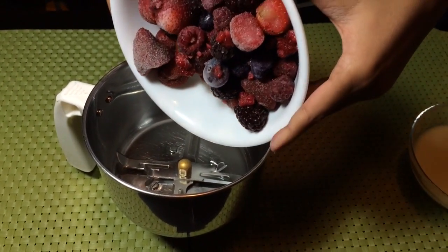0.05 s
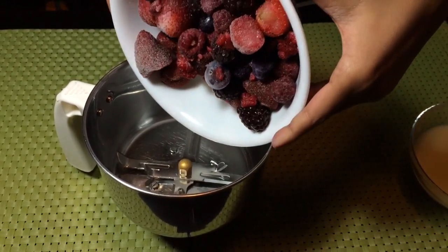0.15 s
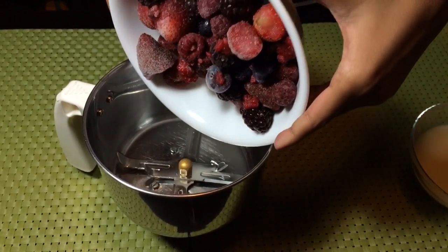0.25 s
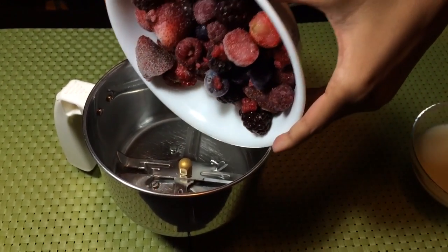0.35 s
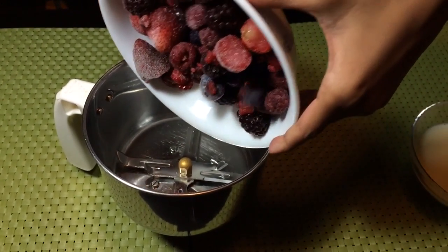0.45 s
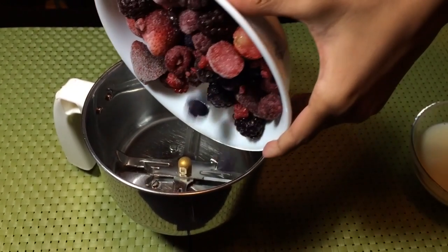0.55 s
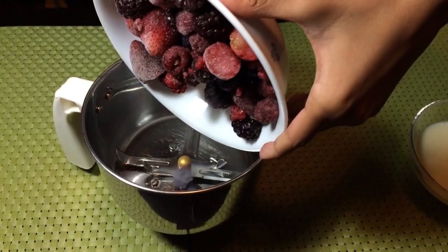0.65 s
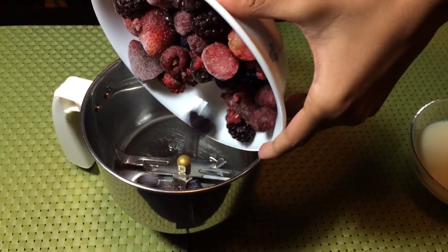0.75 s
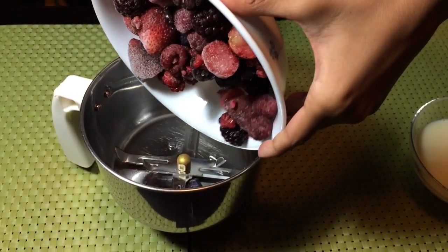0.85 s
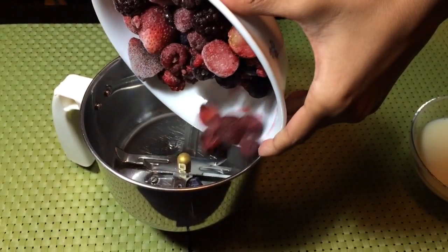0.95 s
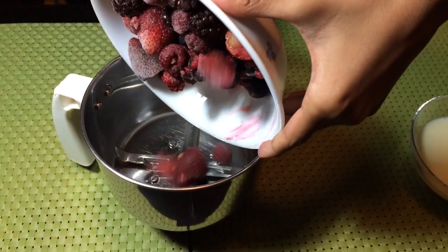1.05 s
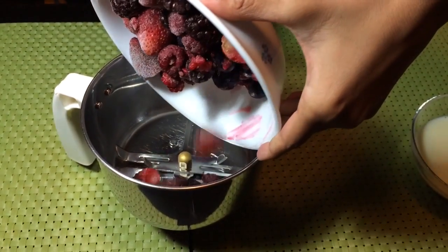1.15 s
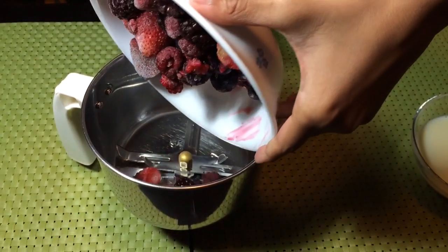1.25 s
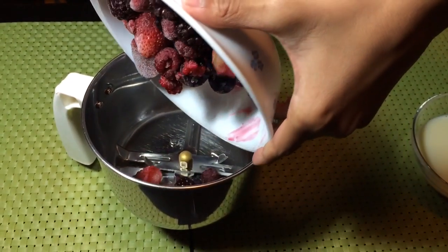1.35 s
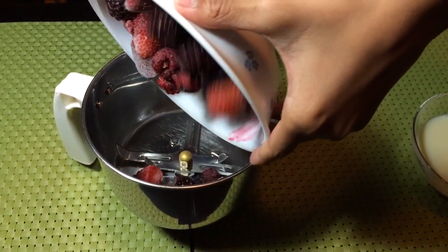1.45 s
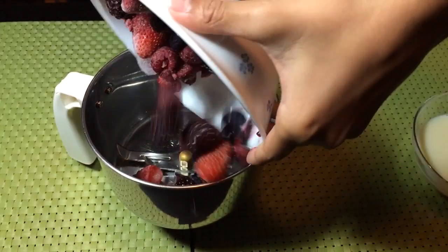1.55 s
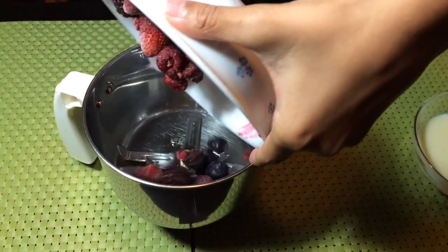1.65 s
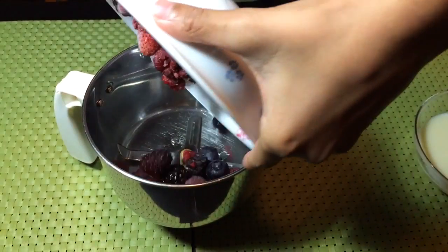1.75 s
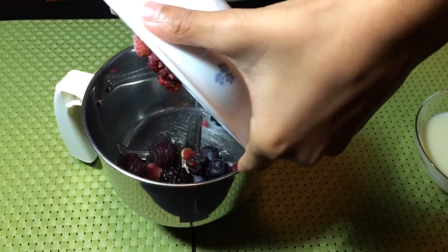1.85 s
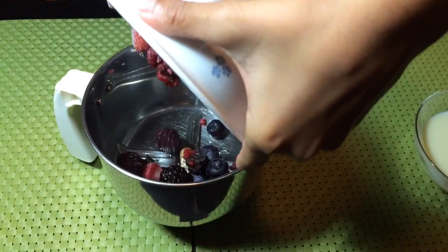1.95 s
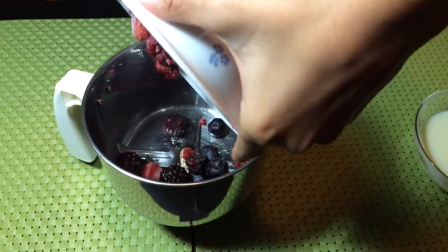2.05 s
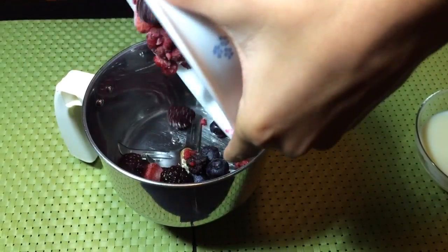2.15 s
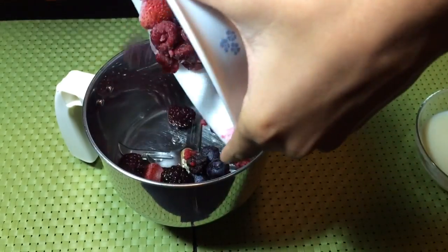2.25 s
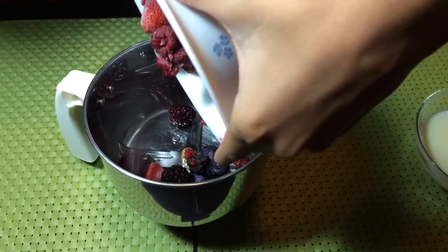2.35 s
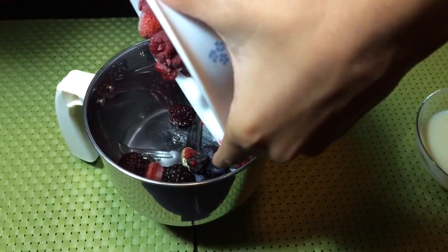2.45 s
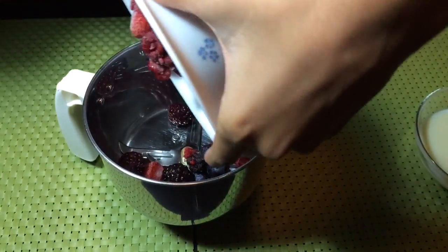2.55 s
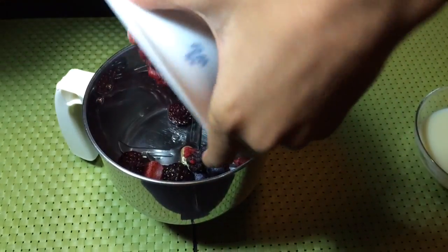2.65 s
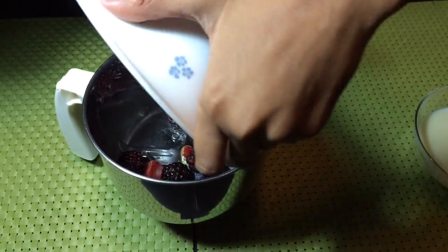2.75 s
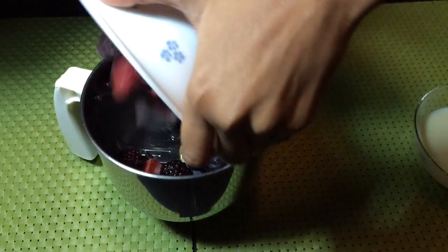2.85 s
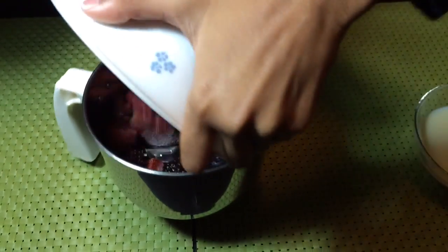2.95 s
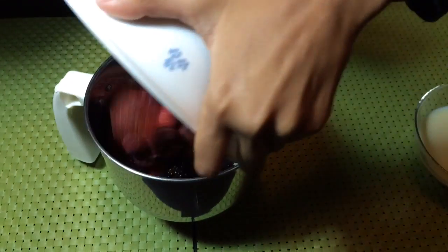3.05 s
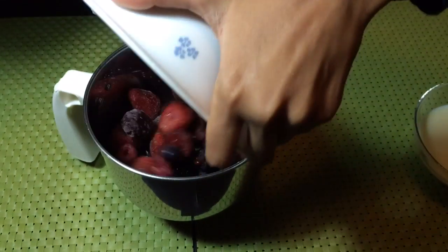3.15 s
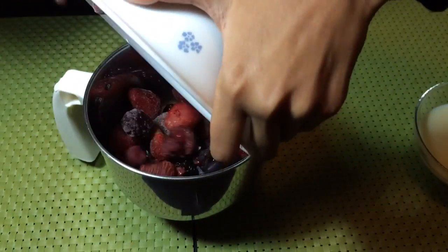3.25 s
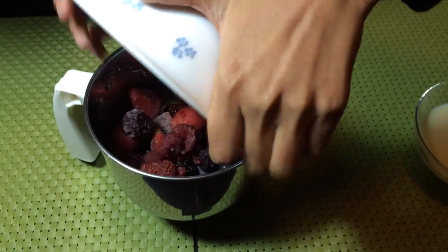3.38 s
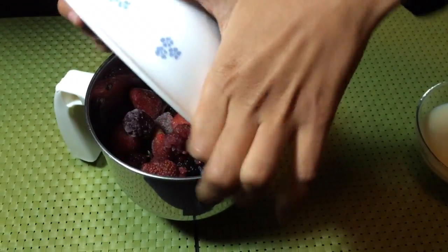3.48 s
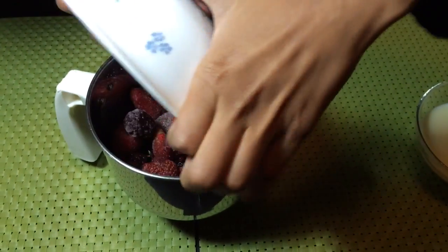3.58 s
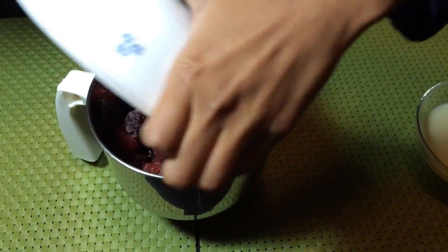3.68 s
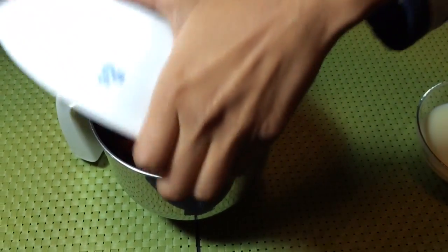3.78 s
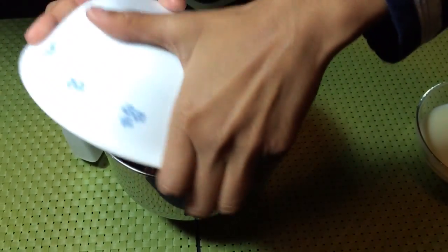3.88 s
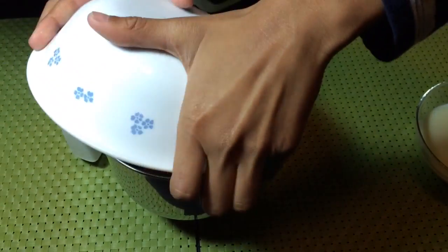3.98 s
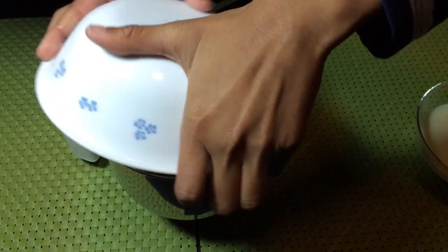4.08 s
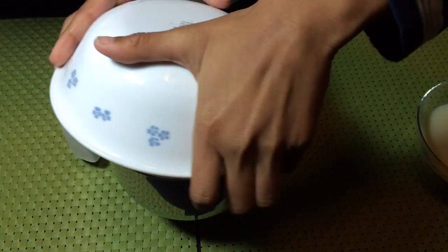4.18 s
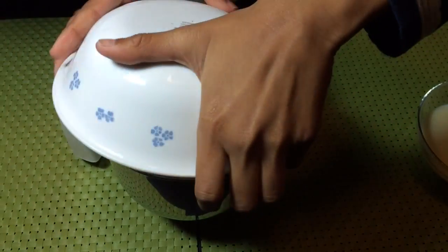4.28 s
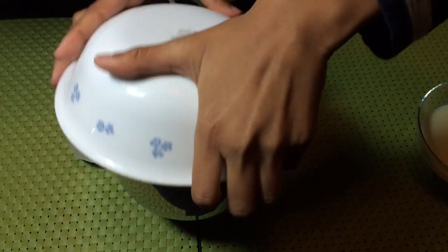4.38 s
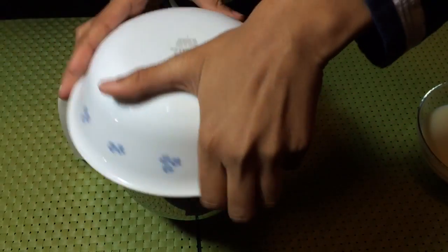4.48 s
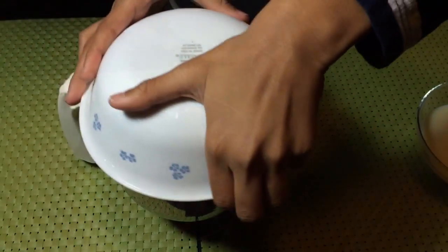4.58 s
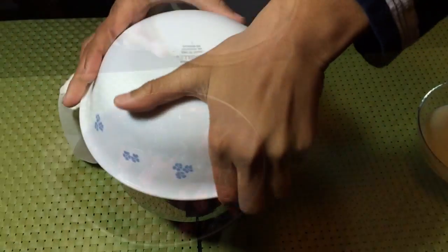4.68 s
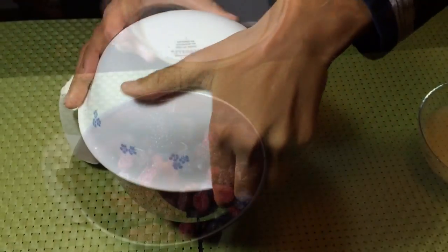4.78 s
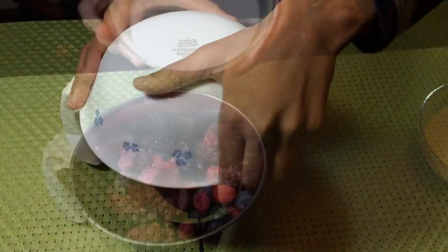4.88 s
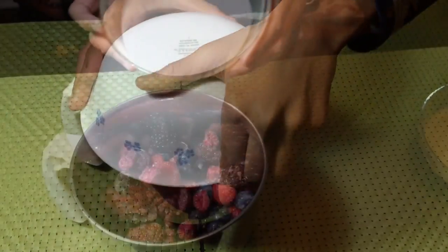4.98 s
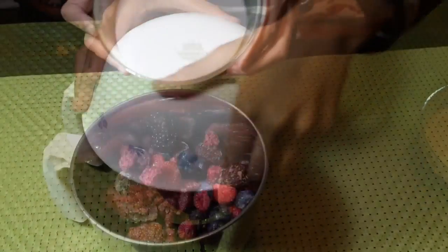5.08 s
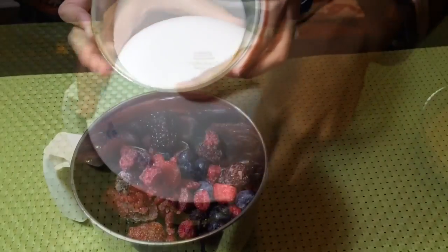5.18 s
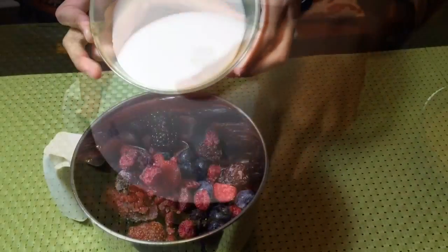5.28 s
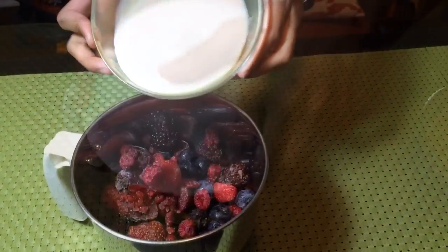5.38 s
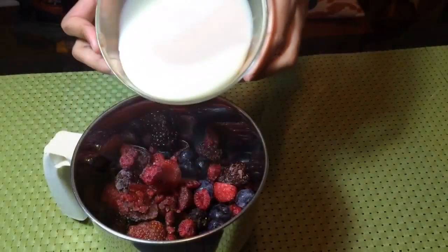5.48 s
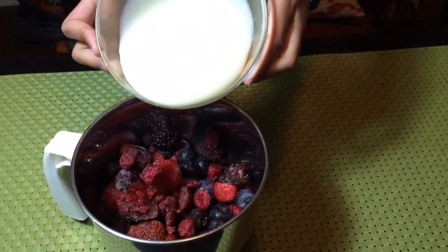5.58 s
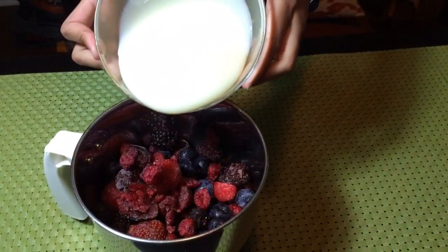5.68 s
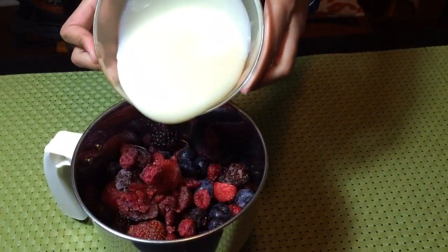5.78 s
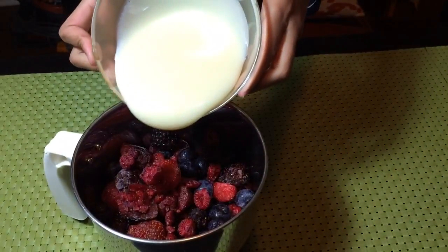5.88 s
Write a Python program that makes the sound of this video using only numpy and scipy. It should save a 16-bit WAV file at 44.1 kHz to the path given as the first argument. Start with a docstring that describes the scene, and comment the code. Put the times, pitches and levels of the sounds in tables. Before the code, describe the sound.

A close, mono kitchen sound with short room echoes over a soft, bass-heavy hush and faint hum. Near 0.4 s a bowl lightly clinks on a steel jar's rim. From 0.7 to 1.4 s frozen berries drop singly and in clusters, small pitched knocks with icy cracks, hollow jar resonance and light table thuds. A harder clatter bursts at 1.6-1.8 s, then thins to a few soft taps by 2.05 s. At 2.5 s the bowl clanks; at about 2.86 s the biggest load crashes in, bright and hard, rattling and tumbling until 3.3 s. Brief squeaks and scrapes follow at 3.5-3.7 s, then a strong double clank near 4.0 s, another at 4.3 s, scraping, and duller, hollower taps at 4.8 s. Faint clinks come around 5.2-5.3 s, then near-quiet with faint distant hollow clatter and a tiny far hiss at 5.6 s.

```python
"""Kitchen table in a small room: frozen berries slide from a bowl into a steel blender jar.
Each berry is a pitched knock that rings the steel, the jar's air and the table, plus an icy noise crack.
The bowl clanks, scrapes and squeaks on the rim: struck modes, random ticks, gliding narrow noise.
Behind: shaped-noise hush, a wavering hum, faint hollow notes of distant clatter and one far hiss."""
import sys
import numpy as np
from scipy import signal
from scipy.fft import rfft, irfft
from scipy.io import wavfile
from scipy.ndimage import uniform_filter1d

SR = 44100
rng = np.random.default_rng(int(sys.argv[2]) if len(sys.argv) > 2 else 0)


def output_pcm(signal):
    """Save a mono or channel-first signal as 16-bit PCM at the path in sys.argv[1].

    Samples are clipped to [-1, 1] before scaling.
    """
    pcm = np.clip(np.atleast_2d(signal).T, -1, 1) * 32767
    wavfile.write(sys.argv[1], SR, np.round(pcm).astype(np.int16))


def to_linear_factor(level_db):
    """Convert decibel levels (scalar or array-like) to linear amplitude factors."""
    exponent = np.asarray(level_db, float) / 20
    return 10 ** exponent


N = 261513

# berries landing: (time [s], knock peak [dB], knock pitch [Hz], table thud [dB], icy crack [dB])
BERRIES = [(0.6938, -42.5, 1114, -44, -50), (0.7212, -43, 1150, -46.5, -55),
           (0.7342, -43, 1280, -43.5, -46), (0.7571, -44, 1630, -53, -49.5), (0.8195, -43, 2450, -60, -64),
           (0.833, -31.5, 1260, -53, -52), (0.9224, -39.5, 1040, -34, -50),
           (0.937, -26.5, 3470, -42.5, -44), (0.9765, -43, 895, -43, -46.5), (1.013, -43, 1270, -50, -72),
           (1.025, -57, 2630, -65, -64), (1.04, -28, 1230, -51, -55.5), (1.083, -64, 1290, -63, -54),
           (1.102, -42.5, 1510, -34, -49), (1.1236, -21.5, 1090, -38, -66), (1.1377, -36, 1000, -40, -63),
           (1.1612, -28, 1047, -48, -46.5), (1.1657, -30.5, 1130, -41, -84), (1.198, -50, 2510, -61, -57),
           (1.2134, -42, 1660, -47, -59), (1.2405, -62, 1670, -39.5, -53.5), (1.254, -38.5, 1630, -45, -42),
           (1.309, -37, 1630, -37.5, -41.5), (1.34, -38, 2560, -48.5, -42), (1.3712, -35.5, 2620, -66, -57),
           (1.56, -34.5, 1890, -71, -52.5), (1.6081, -14.5, 1685, -33.5, -27.5),
           (1.6236, -13.5, 2650, -39, -27), (1.6679, -23.5, 1136, -38, -57), (1.7091, -30, 970, -34, -39),
           (1.725, -22.5, 2810, -40, -28.5), (1.7329, -25, 1610, -32, -36),
           (1.7843, -16.5, 2620, -42.5, -53), (1.7998, -21, 1930, -47.5, -39),
           (1.926, -38, 1170, -60, -63.5), (1.952, -44.5, 1094, -43, -69), (2, -49, 640, -51.5, -66),
           (2.044, -48.5, 877, -49, -60), (2.4652, -43.5, 970, -39, -50.5),
           (2.4724, -40.5, 1170, -43.5, -33), (2.855, -12.5, 2630, -42, -24), (2.8625, -7, 2810, -23, -21),
           (2.8667, -9, 2220, -35.5, -19.5), (2.8867, -11, 1970, -36, -32),
           (2.9784, -14.5, 917, -38.5, -48), (3.0086, -17.5, 1808, -36, -29), (3.0329, -30, 930, -38, -38),
           (3.116, -35.5, 985, -44, -45.5), (3.1374, -31.5, 1160, -50, -45),
           (3.19, -23.5, 1800, -28.5, -40), (3.3932, -49, 1190, -52.5, -61.5),
           (3.9103, -49, 2310, -73.5, -72), (4.0632, -51, 1600, -46.5, -62),
           (4.1166, -38.5, 1300, -46.5, -63), (4.6481, -47.5, 2000, -38, -56.5)]
# bowl striking the rim: (time [s], low ring peak [dB], table thud [dB], upper ring [dB], icy crack [dB])
CLANKS = [(0.4329, -24.5, -51.5, -34, -43), (2.505, -15, -46.5, -39, -34.5), (3.9852, -10, -42, -28.5, -34),
          (3.993, -10, -29.5, -32.5, -42), (4.2892, -20, -50, -32, -44), (4.7836, -25.5, -49, -39.5, -42.5),
          (4.8357, -23.5, -45, -39, -74), (5.1743, -47.5, -71.5, -68, -61.5),
          (5.249, -32.5, -55, -54.5, -71), (5.2771, -27, -45, -38.5, -47.5)]
# strokes of the bowl along the rim: (time of height [s], rise [s], fall [s], low ring [dB], treble [dB])
SCRAPES = [(.56, .09, 0.23, -66, -60), (3.53, .045, 0.066, -47, -45.5), (3.585, .05, 0.086, -51.5, -56),
           (3.665, .035, 0.032, -54, -53), (4.04, .02, 0.14, -48, -53), (4.19, .2, .11, -55, -59),
           (4.34, .02, 0.35, -60, -62.5), (4.525, .045, .05, -37, -43.5), (4.64, .15, 0.12, -56.5, -60),
           (4.776, 0.08, 0.011, -61, -54), (4.87, .02, .15, -62, -67), (5.2, 0.11, .12, -66, -63.5),
           (5.44, .15, .1, -64.5, -73)]
# bowl squeaking on the rim: (time [s], length [s], start pitch [Hz], end pitch [Hz], level per partial [dB])
SQUEAKS = [(3.512, 0.048, 671, 643, -51.5), (3.561, 0.063, 704, 638, -55.5)]
# berries rolling over one another: (time of height [s], rise [s], fall [s], low ring [dB], treble [dB])
TUMBLES = [(1.379, 1, 0.033, -72, -78.5), (1.64, 0.017, .12, -39.5, -42), (1.741, 0.12, 0.21, -51.5, -51.5),
           (2.06, .4, .03, -66, -72), (2.88, .02, .13, -30.5, -29), (2.96, 0.051, 0.4, -42, -47.5),
           (3.32, 0.22, 0.03, -64, -57.5)]
# modes of a berry's knock: (ratio to pitch [1], relative level [dB], t60 before damping [s])
KNOCK = [(1, 0, 0.035), (0.62, -8, 0.03), (1.2, -6, 0.02), (1.45, -7, 0.025), (2.3, -10, 0.02)]
# modes of the jar's steel wall: (frequency [Hz], relative level [dB], t60 before cap and damping [s])
JAR_MODES = [(1367.5, -1.5, 0.27), (1886, 0.5, 0.17), (1980, -5, 0.11), (2424, -13.5, 0.35),
             (2380, -4, 0.11), (2500, -16, 0.39), (3160, -8, 0.51), (3600, -15.5, 0.082), (4606, 5.5, 0.17),
             (5400, -21, 0.25), (5360, -3, 0.49), (6800, -6, 0.21), (6875, -7, 0.074), (7080, -28.5, 1.0),
             (7370, -5, 0.42), (7900, -29.5, 0.37), (7790, -16, 0.13), (8350, -26.5, 0.39)]
# modes of the bowl: (frequency [Hz], relative level [dB], t60 before cap and damping [s])
BOWL_MODES = [(1135, -7, 0.08), (1617, -5.5, 0.15), (1934, 3.5, 0.069), (2347, -4, 0.22),
              (2620, -9.5, 0.14), (2874, -9, 0.81), (3600, -25, 5.0), (3660, -17, 0.61), (4630, -15.5, 1),
              (4850, -4, 0.19), (6310, 0.5, 0.079), (7310, -9, 0.22), (9140, -21.5, 0.47),
              (11200, -25.5, 0.088), (10400, -26.5, 0.2), (13200, -21, 0.26), (12500, -18.5, 0.33),
              (14300, -38, 5.0)]
# modes of the table: (frequency [Hz], relative level [dB], t60 before damping [s])
TABLE_MODES = [(64, -3.5, .08), (86.5, -10, 0.059), (113, -0.5, 0.19), (152, 3.5, 0.099), (195, -2, .15),
               (222.3, -2.5, 0.14), (276, -7, 0.066)]
# air note, rising as the jar fills, dropping when the bowl covers it:
# (time [s], pitch [Hz], t60 before cap and damping [s], readiness to sound [dB])
AIR = [(.7, 562, 0.93, 1), (.78, 568, 0.28, 4), (.82, 580, 0.069, 2), (1.0, 589, 0.066, -5.5),
       (1.3, 641, 0.076, -1), (2.0, 584, 0.054, -4), (2.9, 696, 0.11, -6.5), (3.3, 712, 0.069, -0.5),
       (4.0, 597, 0.043, 0), (4.65, 443, 0.17, -11), (4.77, 318.7, 0.095, 22), (4.9, 305, 0.26, 2.5),
       (5.3, 347, 0.13, -1.5)]
# spectrum of an icy crack, before random tilts: (frequency [Hz], relative density [dB per Hz])
CRACK = [(1200, -31.5), (2400, -14), (3300, -5), (4000, -16), (4960, -5), (8350, -4.5), (9140, -8.5),
         (12000, 0), (14500, -1.5), (15400, -3), (16300, -45.5)]
# spectrum of glaze on steel: (frequency [Hz], relative density [dB per Hz])
RASP = [(1200, -34.5), (2060, -20), (3500, -22), (4860, -3.5), (6400, -12), (9140, -10.5), (12800, -6.5),
        (15200, -8), (16300, -60)]
# spectrum of the room hush: (frequency [Hz], relative density [dB per Hz])
HUSH = [(15, -50), (25, -23.5), (53, -2.5), (89, -7), (124, -1), (146, -8.5), (202, -12), (481, -24),
        (630, -25.5), (722, -22.5), (2020, -33.5), (3390, -37.5), (4820, -40), (14700, -43), (16300, -63)]
# wavering appliance hum: (frequency [Hz], width [Hz], level [dB])
HUM = (120, 9.4, -63)
# hollow notes of distant clatter:
# (time [s], length [s], start pitch [Hz], end pitch [Hz], level before fade [dB])
FAR_CLATTER = [(4.531, 0.14, 518, 480, -52.5), (4.987, 0.11, 619, 626, -59.5), (5.426, 0.13, 618, 643, -62),
               (5.686, .13, 660, 608, -59.5), (5.755, 0.16, 513, 518, -61)]
# brief far hiss: (start level of lower band [dB], t60 [s], lower band centre [Hz], its width [Hz])
PUFF = (-60, 0.66, 4603.5, 1508)
# room echoes: (frequency [Hz], t60 [s])
KITCHEN = [(150, 0.63), (600, 0.43), (2000, 0.28), (5000, 0.29), (12000, 0.063)]

HUSH_DB, PUFF_S = -57.5, 5.617
SPOT_DB, SPLIT_HZ = 3, 3400  # random spread of mode levels; border of low and high modes
SPLITS = 3  # each mode of a round vessel in contact splits into close neighbours
DETUNE = 0.04  # random shift of the low modes, as a share of their pitch
SPAN_DB = 25  # rise and fall of a stroke
AIR_FROM_BLOW, CLANK_AIR_DB = 0.3, -14  # share of blow against thud in driving the air; rim drives less
EMPTY_RING, FILL_S = 0.61, 4  # empty steel's share of its ring; halves over this time as fruit piles up
EDGE_HZ, ECHO_DB = 15350, -14  # top of the microphone path; echoes against the direct sound
T = np.arange(SR // 4) / SR  # time within one blow [s]
KNOTS = np.maximum(1 - abs(T - np.arange(0, 0.26, 0.008)[:, None]) / 0.008, 0)  # 8 ms triangles


def evened(x, size=None):
    """Scales to rms 1, over the first samples if a size is given."""
    return x / np.sqrt(np.mean(x[:size] ** 2) + 1e-20)


def read(points, hz):
    """Reads a spectrum on a log-frequency axis."""
    f, value = np.transpose(points)
    return np.interp(np.log(hz + 1), np.log(f + 1), value)


def add(mix, s, sound):
    """Mixes a sound in at a time."""
    part = mix[round(s * SR):][:len(sound)]
    part += sound[:len(part)]


def coloured(x, points):
    """Gives noise a spectrum."""
    gain = to_linear_factor(read(points, np.fft.rfftfreq(len(x), 1 / SR)))
    return irfft(rfft(x) * gain, len(x))


def narrow_noise(hz, width_hz, size):
    """Slow complex noise turned up to hz, which may glide: an unsteady tone or band."""
    pole = np.exp(-np.pi * width_hz / SR)
    slow = signal.lfilter([1], np.convolve([1, -pole], [1, -pole]), rng.standard_normal((2, size)))
    carrier = np.exp(2j * np.pi * np.cumsum(hz * np.ones(size)) / SR)
    return evened(((slow[0] + 1j * slow[1]) * carrier).real)


def ring(modes, spread_db, damping, rough, low_hz=0, high_hz=SR, detune=0):
    """Dying sines; each mode gets a random level, phase and any small detune, and wavers at random."""
    chosen = [m for m in modes if low_hz <= m[0] < high_hz]
    hz, db, t60_s = np.transpose(chosen)[:, :, None]
    level, phase, shift = rng.standard_normal((3, len(hz), 1))
    waver = 1 + rough * rng.standard_normal((len(hz), len(KNOTS))) @ KNOTS
    decay = to_linear_factor(db + spread_db * level - 60 * T / (np.minimum(t60_s, 0.4) * damping))
    tones = np.sin(2 * np.pi * hz * (1 + detune * shift) * T + phase)
    contact = 1 - np.exp(-T / 0.00019)  # the blow lasts a moment
    return contact * (decay * waver * tones).sum(0)


def crack(spectrum, rise_s, t60_s, tail_db, tail_t60_s):
    """A burst of brittle noise with a short rattle after it; every blow favours other bands."""
    colour = [(hz, db + 5 * rng.standard_normal()) for hz, db in spectrum]
    decay = to_linear_factor(-60 * T / t60_s) + to_linear_factor(tail_db - 60 * T / tail_t60_s)
    noise = coloured(rng.standard_normal(len(T)), colour)
    return evened(noise * (1 - np.exp(-T / rise_s)) * decay, size=440)


def air_note(s):
    """Pitch [Hz], t60 [s] before damping and readiness [dB] of the jar's air at a moment."""
    time_s, *columns = np.transpose(AIR)
    return [np.interp(s, time_s, column) for column in columns]


def body(s, thud_db, blow_db, air_db):
    """What lies under every blow: the table's thud and the note of the air in the jar."""
    hz, t60_s, ready_db = air_note(s)
    swell = 1 - np.exp(-T / 0.002)  # bass takes a moment to build
    air_modes = [(hz, 0, t60_s), (1.13 * hz, -7, 0.42 * t60_s)]
    air = evened(swell * ring(air_modes, 2.7, 0.51, 0.41, detune=0.02), size=440)
    drive_db = AIR_FROM_BLOW * blow_db + (1 - AIR_FROM_BLOW) * thud_db + ready_db + air_db
    thud = evened(swell * ring(TABLE_MODES, 2.5, 0.6, 0.33, detune=0.05), size=660)
    return to_linear_factor(thud_db) * thud + to_linear_factor(drive_db) * air


def berry(s, peak_db, hz, thud_db, crack_db):
    """A short pitched knock; the harder the knock and crack, the more the steel rings."""
    knock = ring([(ratio * hz, db, t60_s) for ratio, db, t60_s in KNOCK], 2.1, 0.68, 0.41)
    steel_db = 0.56 * crack_db + 0.83 * peak_db - 3
    steel = ring(JAR_MODES * 2, 3.4, EMPTY_RING / (1 + s / FILL_S), 0.95, detune=DETUNE)
    steel = to_linear_factor(steel_db) * evened(steel, size=440)
    ice = to_linear_factor(crack_db) * crack(CRACK, 0.00076, 0.024, -19.0, 0.07)
    return to_linear_factor(peak_db) * knock / abs(knock).max() + steel + ice + body(s, thud_db, peak_db, 0)


def rubbing(stroke, modes, per_s, lumps_db, damping, air_db, crackle, spectrum):
    """Many tiny random ticks ring a body and the jar's air, and crackle on their own."""
    s, rise_s, fall_s, low_db, high_db = stroke
    t = np.arange(-rise_s, fall_s, 1 / SR)
    sizes = to_linear_factor(lumps_db * np.minimum(rng.exponential(1, (3, len(t))), 4))
    ticks = sizes * (rng.random((3, len(t))) < per_s / SR)
    ticks *= rng.choice([-1., 1.], ticks.shape)
    air_hz, air_t60_s = air_note(s)[:2]
    modes = modes * SPLITS + [(air_hz, air_db, air_t60_s)]
    low = ring(modes, SPOT_DB, damping, 0.64, high_hz=SPLIT_HZ, detune=DETUNE)
    low = evened(signal.fftconvolve(ticks[0], low)[:len(t)])
    high = ring(modes, SPOT_DB, 2.5 * damping, 0.91, low_hz=SPLIT_HZ, detune=DETUNE / 5)
    high = evened(signal.fftconvolve(ticks[1], high)[:len(t)])
    high = evened(high + crackle * evened(coloured(ticks[2], spectrum)))
    swell = to_linear_factor(-SPAN_DB * np.where(t < 0, -t / rise_s, t / fall_s))
    sound = swell * (to_linear_factor(low_db) * low + to_linear_factor(high_db) * high)
    return s - rise_s, sound * signal.windows.tukey(len(t), 0.03)


def tumble(stroke):
    """Berries rolling over one another tick on the jar's steel."""
    return rubbing(stroke, JAR_MODES, 2500, 1.8, 0.15, -1, 2.9, CRACK)


def scrape(stroke):
    """The bowl's glaze ticks along the steel rim and rings the bowl."""
    return rubbing(stroke, BOWL_MODES, 2000, 1.5, 0.13, -1.8, 1.16, RASP)


def clank(s, peak_db, thud_db, upper_db, crack_db):
    """The bowl rings in its low and high modes, loudest while the contact still chatters."""
    jitter = evened(uniform_filter1d(rng.standard_normal(len(T)), size=6))
    chatter = 1 + 2.6 * to_linear_factor(-60 * T / 0.19) * (1 + jitter)
    modes = BOWL_MODES * SPLITS
    low = ring(modes, SPOT_DB, 0.47, 1.2, high_hz=SPLIT_HZ, detune=DETUNE) * chatter
    high = ring(modes, SPOT_DB, 0.24, 0.91, low_hz=SPLIT_HZ, detune=DETUNE / 3) * chatter
    rings = to_linear_factor(peak_db) * low / abs(low).max() + to_linear_factor(upper_db) * evened(high, size=440)
    ice = to_linear_factor(crack_db) * crack(RASP, 0.0011, 0.022, -18.5, 0.13)
    return rings + ice + body(s, thud_db, peak_db, CLANK_AIR_DB)


def squeak(s, length_s, start_hz, end_hz, db):
    """The glaze sticks and slips on the rim: an unsteady note with its first overtones."""
    hz = np.linspace(start_hz, end_hz, round(length_s * SR))
    note = sum(narrow_noise(k * hz, 64, len(hz)) for k in (1, 2, 3))
    return s, to_linear_factor(db) * note * signal.windows.tukey(len(hz), 0.6)


def kitchen(x):
    """Sparse echoes of random sign, each band dying at its own speed."""
    taps = np.zeros(SR // 2)
    start = np.arange(200, SR // 2 - 20, 20)
    taps[start + rng.integers(0, 20, len(start))] = rng.choice([-1., 1.], len(start))
    hz, t, z = signal.stft(taps, SR, nperseg=256)
    decay = to_linear_factor(-60 * t / read(KITCHEN, hz)[:, None])
    tail = signal.istft(z * decay, SR, nperseg=256)[1]
    return signal.fftconvolve(x, tail / np.linalg.norm(tail))[:N]


def hush():
    """Steady room noise: white noise given a bass-heavy spectrum."""
    return to_linear_factor(HUSH_DB) * evened(coloured(rng.standard_normal(N), HUSH))


def hum():
    """Appliance hum: noise so narrow that it is a wavering tone."""
    hz, width_hz, db = HUM
    return to_linear_factor(db) * narrow_noise(hz, width_hz, N)


def far_clatter(s, length_s, start_hz, end_hz, db):
    """A faint hollow note of distant clatter: narrow noise that fades."""
    hz = np.linspace(start_hz, end_hz, round(length_s * SR))
    shape = signal.windows.tukey(len(hz), 0.3) * np.linspace(1, 0.3, len(hz))
    return s, to_linear_factor(db) * narrow_noise(hz, 84, len(hz)) * shape


def puff():
    """A brief far hiss: two dying bands of noise."""
    db, t60_s, hz, width_hz = PUFF
    hiss = narrow_noise(hz, width_hz, len(T)) + 0.76 * narrow_noise(1.45 * hz, 2.1 * width_hz, len(T))
    return PUFF_S, to_linear_factor(db - 60 * T / t60_s) * hiss


def background():
    """Room hush, hum, faint distant clatter and one far hiss."""
    out = hush() + hum()
    for row in FAR_CLATTER:
        add(out, *far_clatter(*row))
    add(out, *puff())
    return out


def scene():
    """All blows and rubbing, their echoes, and the room behind."""
    near = np.zeros(N)
    for row in BERRIES:
        add(near, row[0], berry(*row))
    for row in CLANKS:
        add(near, row[0], clank(*row))
    for row in SCRAPES:
        add(near, *scrape(row))
    for row in SQUEAKS:
        add(near, *squeak(*row))
    for row in TUMBLES:
        add(near, *tumble(row))
    return (near + to_linear_factor(ECHO_DB) * kitchen(near) + background())[None]


def band_limit(x):
    """A steep low-pass at the top of the band."""
    return signal.sosfilt(signal.butter(12, 16480, fs=SR, output="sos"), x)


def record(dry):
    """The microphone loses the top treble and the deepest bass."""
    low_pass = signal.firwin(255, EDGE_HZ, window=("kaiser", 5), fs=SR)
    mix = signal.oaconvolve(dry, low_pass[None], "same")
    mix = signal.lfilter(*signal.butter(2, 55, "high", fs=SR), mix)
    return band_limit(mix)


dry = scene()
out = record(dry)
output_pcm(out)
```